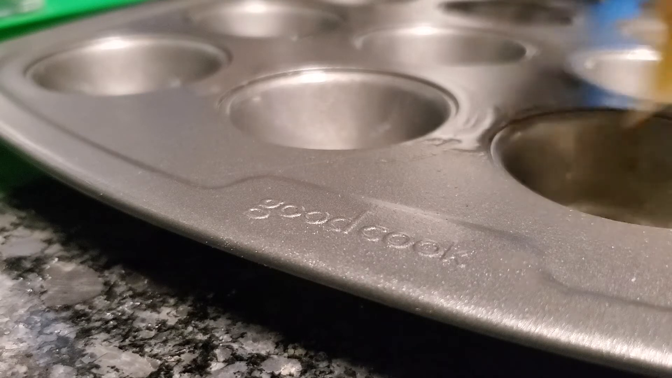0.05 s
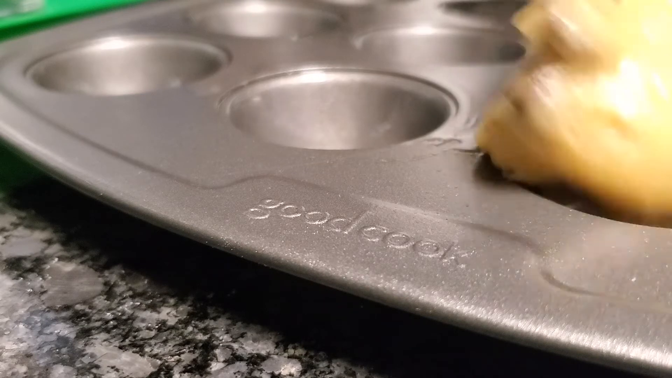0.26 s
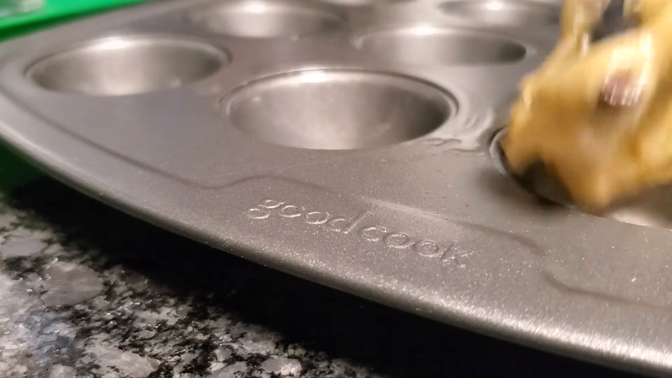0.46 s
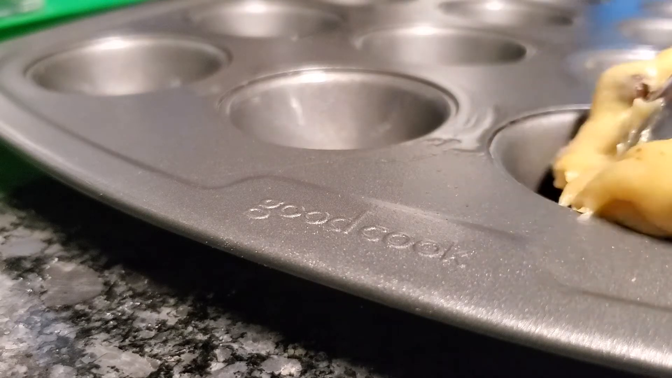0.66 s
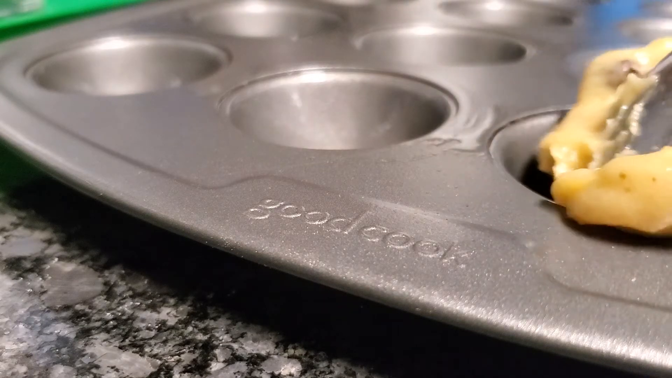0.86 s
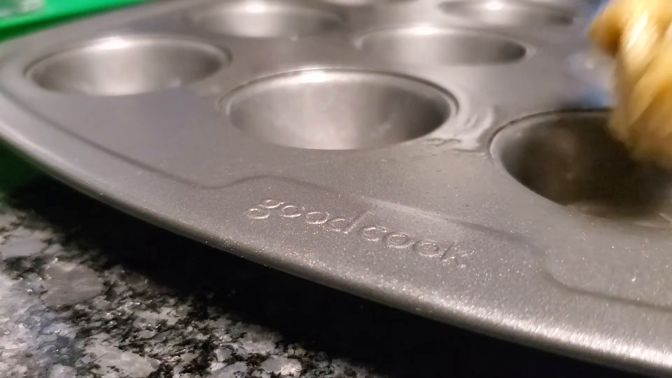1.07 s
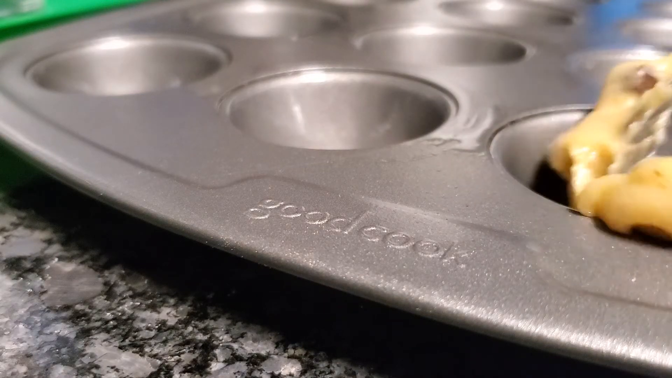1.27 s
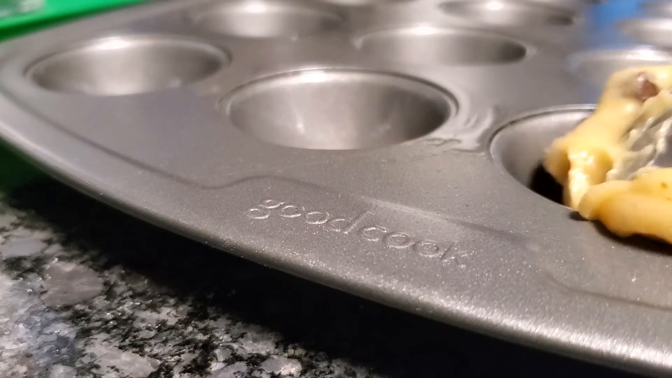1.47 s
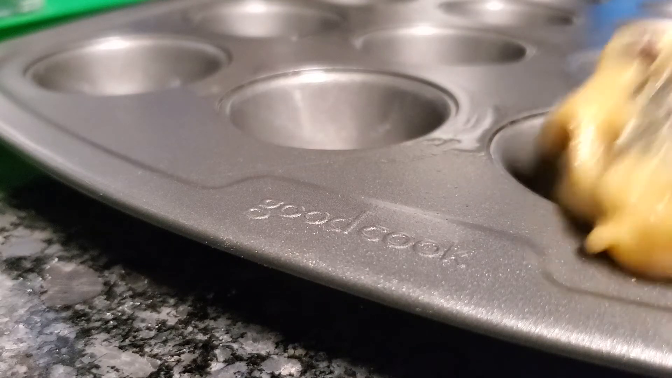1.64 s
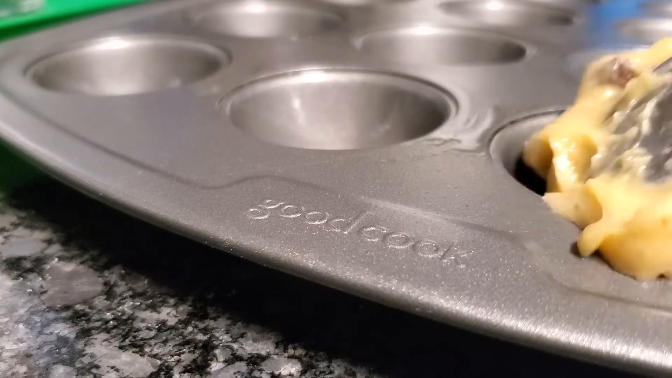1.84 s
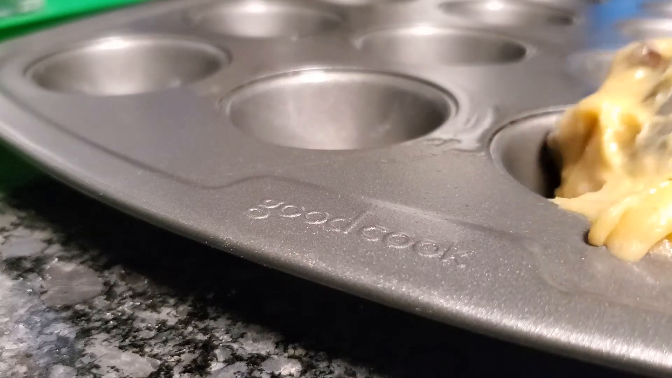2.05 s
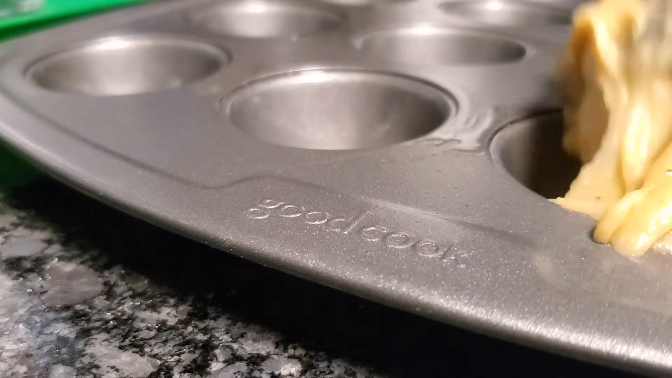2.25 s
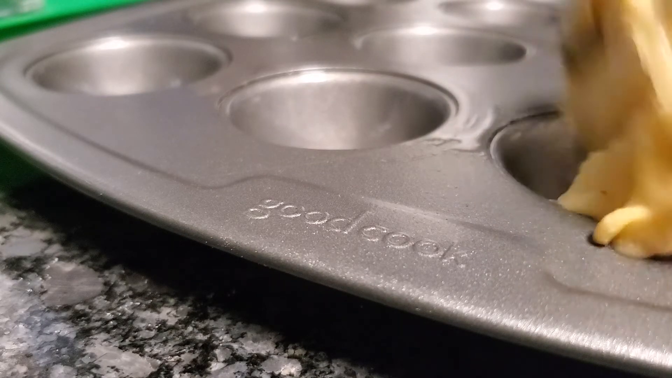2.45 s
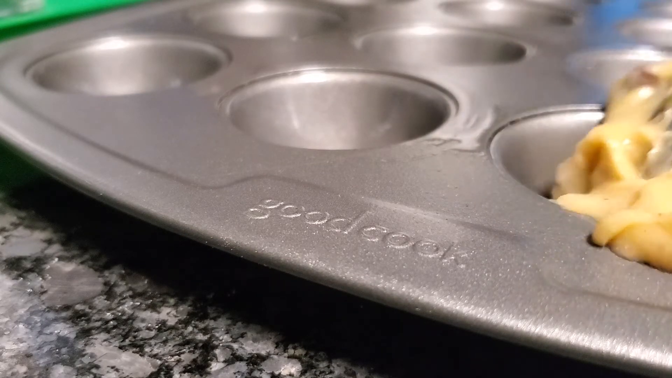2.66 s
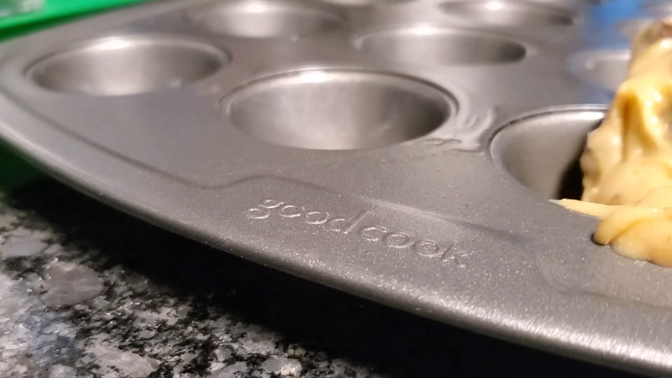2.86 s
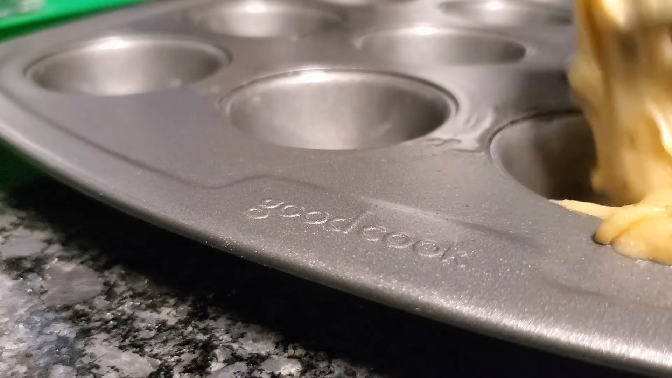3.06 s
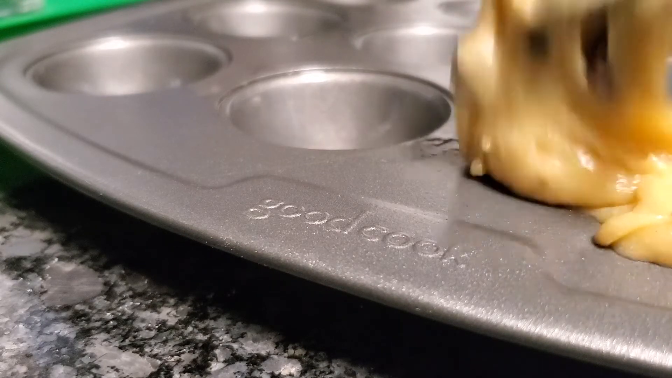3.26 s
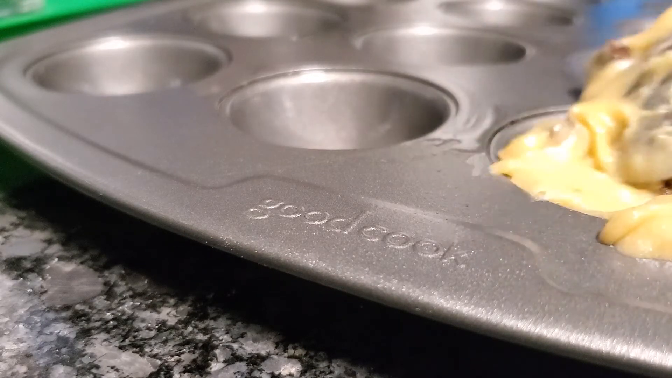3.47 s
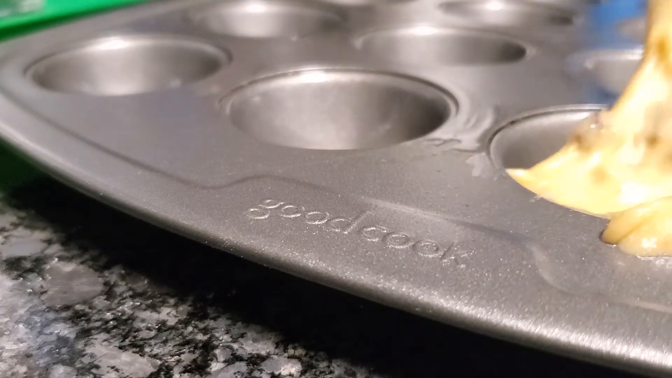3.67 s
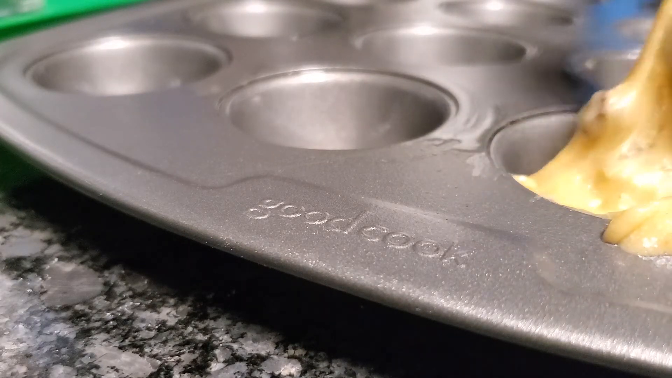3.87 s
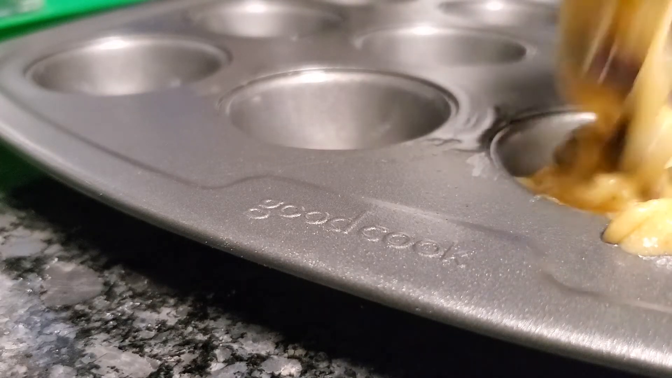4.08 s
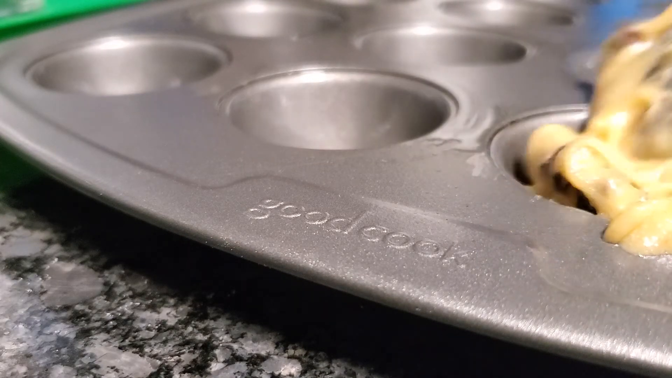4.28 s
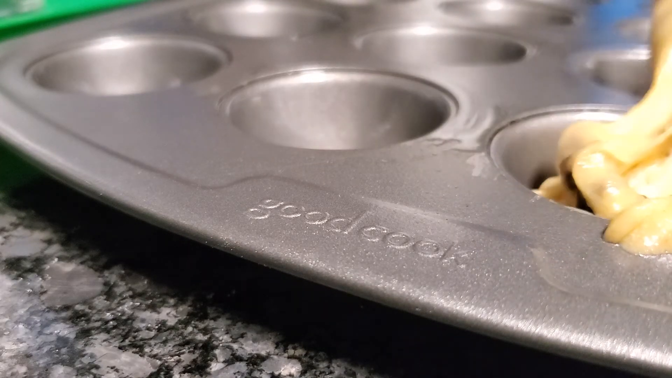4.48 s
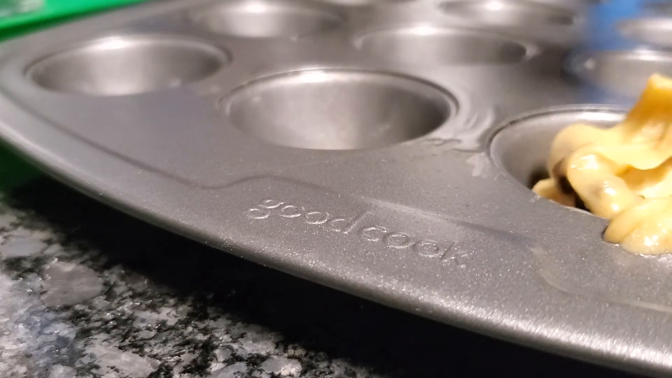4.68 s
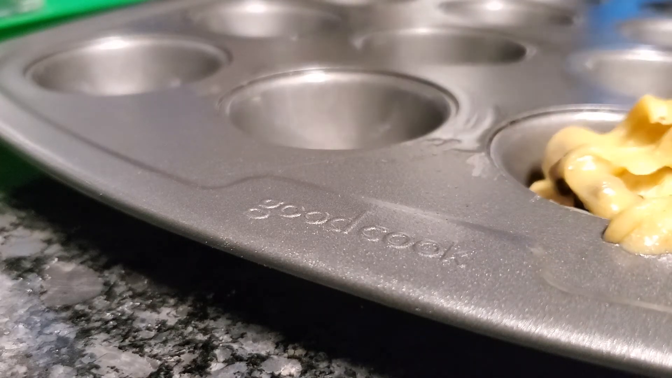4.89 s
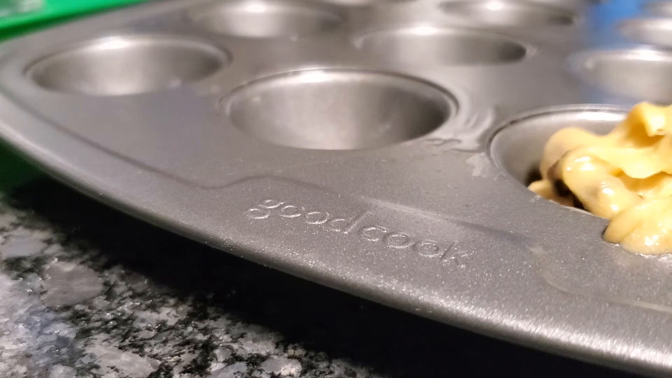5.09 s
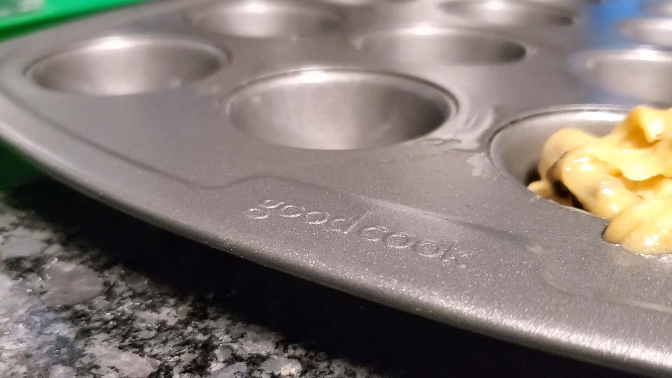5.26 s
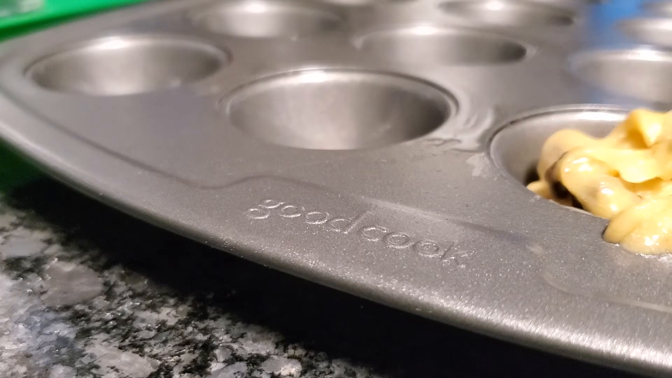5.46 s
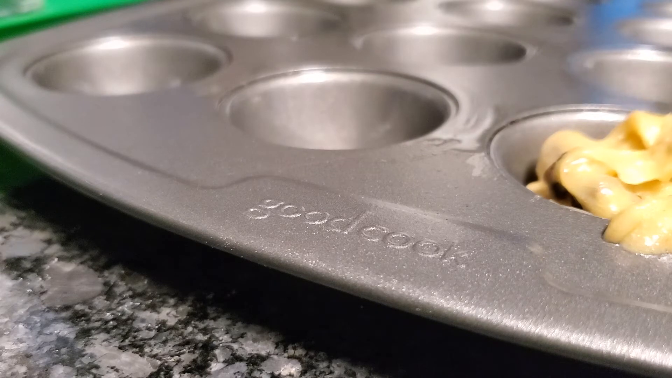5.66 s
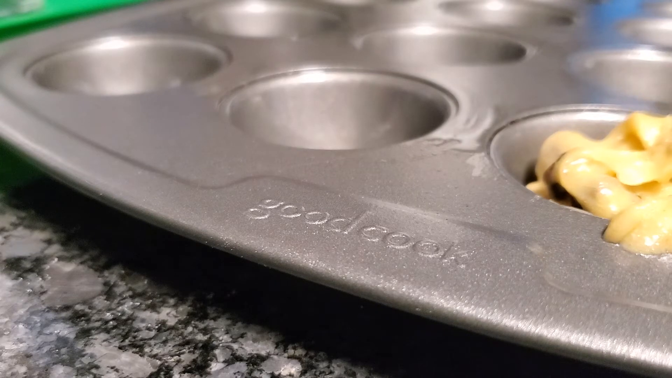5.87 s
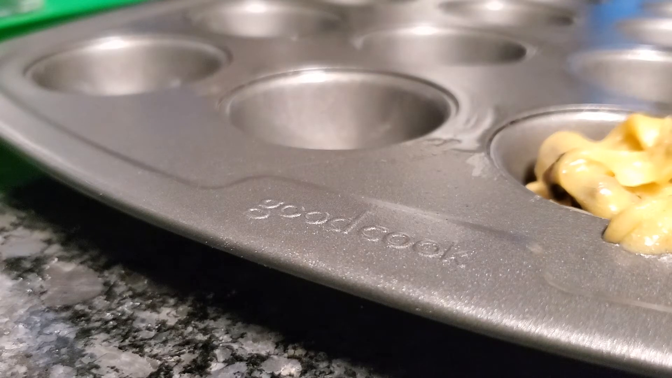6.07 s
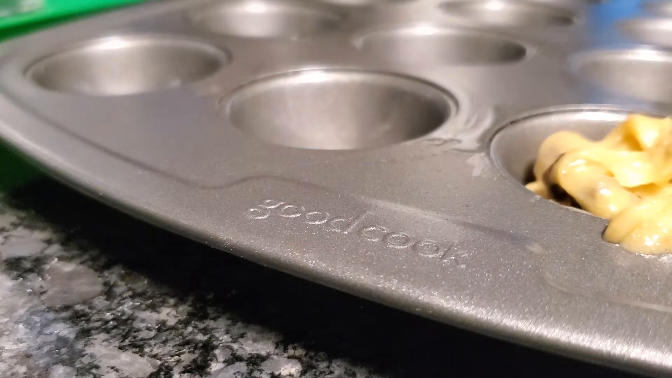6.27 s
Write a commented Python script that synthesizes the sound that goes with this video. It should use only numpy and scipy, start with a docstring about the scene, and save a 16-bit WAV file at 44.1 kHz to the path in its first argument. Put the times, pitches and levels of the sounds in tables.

```python
"""A small kitchen, close to the microphone: wavering tones of an appliance hum over rumble and hiss.
A metal scoop drops thick batter into a steel muffin pan on a stone counter: it clinks on the cup rims,
ringing decaying modes, and wet films part in bright ticks of noise. Batter crackles in swells of torn grains,
and the scoop judders along the rims in stick-slip pulses. A lump slumps softly, and later the scoop is also
drawn through the batter. Last, it knocks dully in the mixing bowl to the right, and a wall answers from the left."""
import sys
import numpy as np
from scipy import signal
from scipy.fft import rfft, irfft, next_fast_len
from scipy.io import wavfile

SR = 44100
rng = np.random.default_rng(int(sys.argv[2]) if len(sys.argv) > 2 else 0)


def dump(signal):
    """Clip the signal to [-1, 1] and save it as 16-bit WAV at the path in sys.argv[1]."""
    limited = np.clip(np.atleast_2d(signal).T, -1, 1)
    pcm = np.round(limited * 32767).astype(np.int16)
    wavfile.write(sys.argv[1], SR, pcm)


N = 279153  # length of the scene [samples]
RING_TIME = np.arange(SR // 2) / SR  # time axis of one ring [s]
ONSET = 1024  # samples over which the level of a blow is taken


def undb(db):
    """Decibels to gain."""
    return 10 ** (np.asarray(db) / 20)


def fade(t60):
    """Exponential decay over the length of one ring, falling 60 dB in t60 seconds."""
    return np.exp(-np.log(1000) * RING_TIME / t60)


def level(x, db, size=None):
    """Scale to an rms level, taken over the first size samples."""
    rms = np.sqrt(np.mean(x[:, :size] ** 2))
    return x * undb(db) / rms


def add(out, s, x):
    """Mix a sound in at time s."""
    i = int(s * SR)
    out[:, i:i + x.shape[1]] += x[:, :N - i]


def noise(colour, size, apart_hz=900):
    """Coloured stereo noise; the two ports hear the bass nearly alike and the treble unrelated."""
    n = next_fast_len(size)
    hz = np.fft.rfftfreq(n, 1 / SR) + 1
    points, db = np.transpose(colour)
    spectrum = undb(np.interp(np.log(hz), np.log(points), db))
    mid, side = np.exp(2j * np.pi * rng.random((2, len(hz))))
    width = np.clip(hz / apart_hz, .25, 1)
    sign = np.array([[1], [-1]])  # left, right
    pair = (mid + sign * width * side) / np.sqrt(1 + width ** 2)
    return level(irfft(pair * spectrum, n)[:, :size], 0)


def contact(x, bright_db, edge_hz):
    """Batter lengthens the contact and cushions the treble: a causal shelf, which a positive value lifts."""
    n = next_fast_len(x.shape[1])
    hz = np.fft.rfftfreq(2 * n, 1 / SR)
    shelf_db = bright_db * (1 - 1 / (1 + (hz / edge_hz) ** 8))
    cepstrum = irfft(np.log(undb(shelf_db)))
    cepstrum[1:n] *= 2  # folded onto positive time: minimum phase
    cepstrum[n + 1:] = 0
    return irfft(rfft(x, 2 * n) * np.exp(rfft(cepstrum)))[:, :x.shape[1]]


def modes(table, scatter_db=2, apart_hz=900):
    """Decaying partials; each point of contact weights them anew, and high ones reach the ports out of step."""
    out = 0
    for hz, db, t60 in table:
        apart = min(hz / apart_hz, 1) ** 2 * np.pi / 4 * rng.choice([-1, 1])
        phase = 2 * np.pi * rng.random() + apart * np.array([[1], [-1]])
        gain = undb(db + scatter_db * rng.standard_normal((2, 1)))
        out = out + gain * fade(t60) * np.sin(2 * np.pi * hz * RING_TIME + phase)
    return level(out, 0, size=ONSET)


ROOM_T60_S, ROOM_DB = 0.34, -15.5  # the small kitchen's reverberation; its level under a blow on the pan


def wash(colour, t60, room_db):
    """Crowded modes that die quickly, followed by the kitchen's reverberation."""
    direct, room = (noise(colour, len(RING_TIME)) for _ in range(2))
    return level(direct * fade(t60) + undb(room_db) * room * fade(ROOM_T60_S), 0, size=ONSET)


# air of the kitchen: (frequency [Hz], density [dB per Hz])
AIR = [(20, -28), (38, -20), (55, 0), (90, -6.5), (150, -15.5), (280, -19.5), (500, -32), (1000, -39),
       (2500, -40), (4400, -43.5), (5400, -34.5), (6400, -40), (8000, -49), (15500, -42)]
AIR_DB = -64
# tones of the appliance: (frequency [Hz], level [dB], unsteadiness [dB])
HUM = [(52.7, -65, 2), (78.3, -68.5, 4), (95.5, -81, 7), (120.6, -62.5, 2), (204.6, -87, 2.5)]


def kitchen(waver_rate=7):
    """A wavering appliance hum over low rumble and faint hiss; waver_rate is random points per second."""
    t = np.arange(N) / SR
    out = level(noise(AIR, N), AIR_DB)
    for hz, db, waver_db in HUM:
        swell, drift = (np.interp(t * waver_rate, np.arange(128), rng.standard_normal(128)) for _ in range(2))
        gain = np.sqrt(2) * undb(db + waver_db * swell)
        out = out + gain * np.sin(2 * np.pi * hz * t + 1.3 * waver_db * drift)
    return out


def radiate(x, lowest_hz):
    """Air slips round the thin metal, so its bass is lost."""
    return signal.sosfilt(signal.butter(2, min(lowest_hz, 2000), "high", fs=SR, output="sos"), x)


# ring of the muffin cups: (frequency [Hz], level [dB], undamped t60 [s])
CUP_MODES = [(312, -19, .25), (378, -13, .3), (560, -8, .19), (598, -4, .19), (634, -2, .19),
             (657, -1, .22), (781, -12, .18), (901, 1, .25), (961, -3, .23), (1245, -6, .25),
             (1340, -9, .21), (1599, -4, .23), (1706, 1, .22), (1880, -8, .2), (2067, -8, .16),
             (2400, -9, .23), (2620, -6, .22), (2676, -4, .24), (2868, -1, .25), (2997, -1, .22),
             (3056, -3, .22), (3160, -10, .22), (4181, -4, .19), (5442, -8, .21), (5926, -3, .18),
             (6368, -4, .15), (6480, -5, .15)]
# crowded, quickly damped modes of the sheet: (frequency [Hz], level [dB])
SHEET = [(70, -31.5), (200, -19.5), (470, -12.5), (620, 5.5), (760, -0.5), (1150, -5), (1650, -3),
         (3050, 0), (3450, -2.5), (5000, -6.5), (6400, -1.5), (7200, -11), (10500, -22), (15500, -30)]
# close, longer-lasting modes of the rolled rims: (frequency [Hz], level [dB])
RIMS = [(1900, -41.5), (2550, -5), (3100, 2), (3500, -33)]


def pan(cups_db, held=1, sheet_t60=0.1, crack_t60=0.032, crack_db=-3, modes_db=-3, rims_t60=0.17, rims_db=-7):
    """The pan's answer to one blow: a crack, shimmer of sheet and rims, ring of the cups (shorter if held < 1)."""
    crack = level(noise(SHEET, len(RING_TIME)) * fade(crack_t60), crack_db, size=ONSET)
    sheet = wash(SHEET, sheet_t60 * held, ROOM_DB)
    rims = undb(rims_db) * wash(RIMS, rims_t60 * held, ROOM_DB)
    cups = modes([(hz, db, t60 * held) for hz, db, t60 in CUP_MODES])
    return crack + sheet + rims + undb(cups_db + modes_db) * cups


# the scoop strikes a rim and skids along it: (time [s], level [dB], bare-metal brightness [dB],
# thud of the whole pan [dB], share of the cup modes [dB], middle of the skid after the blow [s],
# skid length [s], skid level [dB])
STROKES = [(.7022, -21, -23.5, -30, -12.5, 0.099, 0.053, -53.5),
           (0.893, -40, -41, -19.5, -4, 0.052, .1, -51), (1.7391, -22, -9.5, -10.5, 0, 0.02, .028, -27.5),
           (1.839, -29.5, -18, -16.5, -10.5, .003, 0.06, -34.5),
           (2.0048, -34.5, -28.5, -30.5, -1.5, .088, 0.091, -46),
           (2.6727, -26, -12.5, -27, 1, .073, .08, -42), (2.7933, -35.5, -30, -37, 3.5, .042, .07, -39),
           (3.5126, -17, 2.5, -32.5, -2, 0.075, 0.038, -33.5),
           (4.2946, -16.5, 2.5, -33.5, 0, .077, .064, -27)]
# light touches of the scoop: (time [s], level [dB])
TOUCHES = [(1.264, -76), (2.4766, -59.5), (4.431, -46.5)]
# ring of the scoop: (frequency [Hz], level [dB], t60 [s])
SCOOP_MODES = [(813, -1, .22), (1943, -14, .18), (3117, -10, .22), (3720, 0, .17), (3967, -1, .15),
               (4780, -3, .15), (5728, -4, .15), (6010, -3, .14), (6132, -3, .12), (7700, -8, .13),
               (8177, -11, .14), (8680, -12, .14)]
# the whole pan rocking on the counter: (frequency [Hz], level [dB], t60 [s])
ROCK_MODES = [(174, -12, 0.089), (262.4, -1.5, 0.16), (403, -13, 0.48)]
REBOUND_S, REBOUND_DB = .0095, -7.5  # every stroke lands a second time, more weakly
CUSHION_HZ, CUSHION_DB_PER_OCTAVE = 5500, 38  # less batter on the rim: brighter, and cushioned only higher up
HOLLOW_HZ, HOLLOW_DB_PER_OCTAVE = 230, 9  # a blow that hardly rings the cups also misses their hollow low end


def clinks(scoop_db=-14.5, touch_ring_db=-1):
    """The scoop strikes the rims or lightly touches; both bodies ring, and each stroke rocks the pan."""
    out = np.zeros((2, N))
    for s, db, bright_db, thud_db, cups_db, *_ in STROKES:
        edge_hz = CUSHION_HZ * 2 ** (bright_db / CUSHION_DB_PER_OCTAVE)
        lowest_hz = HOLLOW_HZ * 2 ** (-cups_db / HOLLOW_DB_PER_OCTAVE)
        for at, blow_db in ((s, db), (s + REBOUND_S, db + REBOUND_DB)):
            ring = pan(cups_db) + undb(scoop_db) * modes(SCOOP_MODES)
            blow = radiate(ring, lowest_hz) + undb(thud_db) * modes(ROCK_MODES)
            add(out, at, level(contact(blow, bright_db, edge_hz), blow_db, size=ONSET))
    for s, db in TOUCHES:
        touch = wash(SHEET, t60=0.025, room_db=-18) + undb(touch_ring_db) * modes(SCOOP_MODES)
        add(out, s, level(contact(touch, bright_db=-19, edge_hz=4900), db, size=ONSET))
    return out


# the loudest snaps of batter parting from metal: (time [s], level [dB])
TICKS = [(0.7555, -56.5), (1.416, -55.5), (1.6248, -48.5), (1.6488, -50), (1.7415, -37.5), (1.8404, -43.5),
         (1.975, -55.5), (2.0343, -57.5), (2.3926, -52), (3.0286, -46.5), (3.038, -47), (3.087, -44.5),
         (3.8068, -49.5), (4.3776, -32), (4.432, -39.5), (4.5132, -51.5), (5.5158, -39), (5.549, -41),
         (5.6083, -35), (5.8432, -50.5)]
# colour of a snap: (frequency [Hz], level [dB])
TICK_COLOUR = [(500, -23.5), (3000, -18), (6000, -10.5), (8500, -2), (12000, 1), (15500, 4.5)]
THREAD_S, THREAD_DB = 0.048, -17.5  # finer threads break within this time after each snap


def snaps(count=2, t60=0.026, room_db=-23):
    """Films of batter snap with bright ticks; finer threads follow each at random."""
    out = np.zeros((2, N))
    for s, db in TICKS:
        snap = level(wash(TICK_COLOUR, t60, room_db), db, size=200)
        add(out, s, snap)
        for later in THREAD_S * rng.random(count):
            add(out, s + later, undb(THREAD_DB) * snap)
    return out


def squelch(colour, length, grain_db, room_db=-7):
    """A swell of fine crackle: many tiny films tear, a few of them louder; the kitchen carries it on."""
    n = int(length * SR)
    grain = 24  # samples
    sizes_db = grain_db * np.minimum(rng.exponential(size=n // grain + 1), 4)
    grains = np.repeat(undb(sizes_db), grain)[:n]
    crackle = level(noise(colour, n) * grains * np.hanning(n), 0)
    room = rng.standard_normal((2, len(RING_TIME))) * fade(ROOM_T60_S)
    room *= undb(room_db) / np.linalg.norm(room[0])
    room[:, 0] = 1  # the direct path
    return signal.fftconvolve(crackle, room, axes=1)


# the scoop is drawn through the batter: (middle [s], length [s], level [dB], wet brightness [dB])
SMEARS = [(2.052, .2, -66, 8), (2.331, 0.24, -78, 14.5), (2.863, 0.38, -63, -0.5), (3.4, .12, -72.5, -2),
          (4.461, 0.064, -54.5, 0.5), (5.233, 0.23, -63, 4.5), (5.486, 0.16, -72, 8),
          (5.645, 0.092, -43.5, -4), (5.867, 0.12, -61.5, -0.5), (6.268, .17, -69, 6.5)]
# crackle of smeared batter: (frequency [Hz], level [dB])
SMEAR_COLOUR = [(200, 8), (900, 4), (3000, 7.5), (5000, 1.5), (8000, -0.5), (15500, -11)]
# a lump of batter slumps into the cup: (middle [s], length [s], level [dB])
SLUMP = (1.14, 0.14, -67)
# colour of the slump: (frequency [Hz], level [dB])
SLUMP_COLOUR = [(100, -17.5), (300, -2.5), (450, -14), (800, -39), (3000, -54)]
# a skid squeezes batter: fainter and longer than the skid, with its treble lifted
SQUEEZE_DB, SQUEEZE_STRETCH, SQUEEZE_BRIGHT_DB = -24, 1.6, 10


def batter(grain_db=3):
    """Batter crackles while a skid squeezes it or the scoop is drawn through it, and a lump slumps softly."""
    out = np.zeros((2, N))
    squeezes = [(s + later, SQUEEZE_STRETCH * length, db + SQUEEZE_DB, SQUEEZE_BRIGHT_DB)
                for s, *_, later, length, db in STROKES]
    for s, length, db, bright_db in squeezes + SMEARS:
        smear = contact(squelch(SMEAR_COLOUR, length, grain_db), bright_db, edge_hz=4460)
        add(out, s - length / 2, level(smear, db, size=int(length * SR)))
    s, length, db = SLUMP
    add(out, s - length / 2, undb(db) * squelch(SLUMP_COLOUR, length, grain_db=-0.5))
    return out


SKID_BRIGHT_DB, SKID_BRIGHT_SHARE = -12, 0.18  # a skid has its own dullness, plus a share of its blow's brightness


def drags(slip_rate=850, slip_scatter_db=3, soft_hz=1700, rub_cups_db=1):
    """Around or just after each stroke uneven stick-slip pulses swell and die away, ringing the pan."""
    out = np.zeros((2, N))
    for s, _, bright_db, _, cups_db, later, length, db in STROKES:
        n = int(length * SR)
        gaps, sizes = rng.standard_normal((128, 2)).T
        at = (np.cumsum(np.exp(gaps / 2)) * SR / slip_rate).astype(int)
        slips = np.bincount(at, undb(slip_scatter_db * sizes), n)[:n] * np.hanning(n)
        slips = signal.lfilter(*signal.butter(1, soft_hz, fs=SR), slips)  # a slip is softer than a blow
        ring = pan(cups_db + rub_cups_db, held=0.8)  # the pressing scoop damps the metal
        rung = radiate(signal.fftconvolve(ring, slips[None], axes=1), HOLLOW_HZ)
        skid = contact(rung, SKID_BRIGHT_DB + SKID_BRIGHT_SHARE * bright_db, edge_hz=3380)
        add(out, s + later - length / 2, level(skid, db, size=n + 512))
    return out


# scoop knocks in the bowl: (time [s], level [dB], brightness [dB], relative thump [dB], left minus right [dB])
KNOCKS = [(5.3417, -40, -3.5, -7, -5), (5.5154, -34.5, -5, 5, -3.5), (5.549, -40.5, -3, -3, -4),
          (5.6064, -34.5, 1, 4.5, -3), (5.673, -41.5, -3.5, -11, -5), (5.6811, -37.5, -3.5, 3.5, -4),
          (6.179, -46, -16, 1, -0.5), (6.235, -54, -50, -5, -7)]
# ring of the bowl: (frequency [Hz], level [dB], t60 [s])
BOWL_MODES = [(89.5, 0.5, 0.18), (110, -8.5, 0.17), (380, -1.5, 0.13), (452, -6, 0.19), (492, 4.5, 0.15),
              (525, -3, 0.15), (851, -22, 0.22), (1140, -5.5, 0.24), (1630, 5, 0.058), (1780, 2, 0.14)]
# crowded modes of the bowl: (frequency [Hz], level [dB])
BOWL = [(80, -6), (230, -13), (480, 4.5), (650, -4.5), (850, -5), (1200, -5), (1650, -5.5), (2200, -5),
        (3000, -6), (4500, -15), (8000, -19), (15500, -66)]
KNOCK_CUSHION_HZ = 1944  # batter in the bowl alters the blows above this
ECHO_S, ECHO_DB, ECHO_PAN_DB = 0.016, -6, 7.5  # a wall throws each knock back, this much further to the left


def knocks(t60=0.057, room_db=-14, thump_db=-4, crack_db=-2):
    """Dull, short blows of the scoop in the mixing bowl, which stands to the right; a wall answers from the left."""
    out = np.zeros((2, N))
    lag = 20  # samples by which the crack reaches the left port late
    sides = np.array([[.5], [-.5]])
    for s, db, bright_db, weight_db, pan_db in KNOCKS:
        crack = noise(BOWL, len(RING_TIME))[0] * fade(0.017)
        direct = level(np.array([np.roll(crack, lag), crack]), crack_db, size=ONSET)
        thump = undb(thump_db + weight_db) * modes(BOWL_MODES)
        blow = contact(direct + wash(BOWL, t60, room_db) + thump, bright_db, KNOCK_CUSHION_HZ)
        echo = contact(wash(BOWL, t60, room_db), bright_db, KNOCK_CUSHION_HZ)
        add(out, s, level(blow, db, size=ONSET) * undb(pan_db * sides))
        echo = level(echo, db + ECHO_DB, size=ONSET) * undb((pan_db + ECHO_PAN_DB) * sides)
        add(out, s + ECHO_S, echo)
    return out


def scene():
    """Room, pan, batter and bowl together."""
    return kitchen() + clinks() + snaps() + batter() + drags() + knocks()


TOP_HZ = 16100


def record(dry):
    """The recorder cuts the deepest rumble and the top."""
    dry = signal.sosfilt(signal.butter(3, 34, "high", fs=SR, output="sos"), dry)
    return signal.sosfilt(signal.ellip(10, .2, 80, TOP_HZ, fs=SR, output="sos"), dry)


dry = scene()
out = record(dry)
dump(out)
```